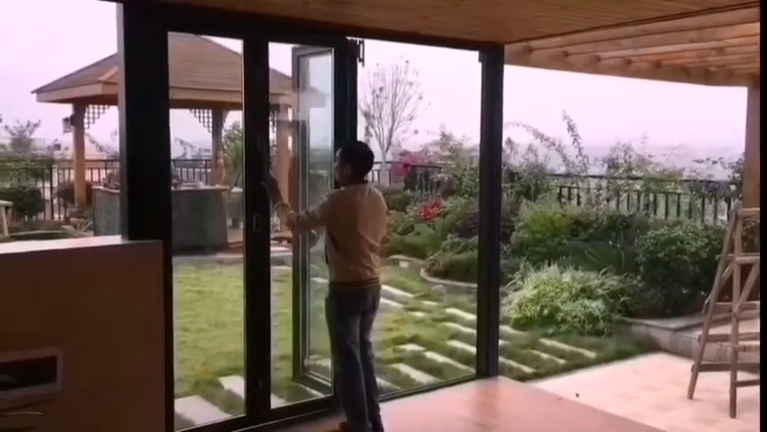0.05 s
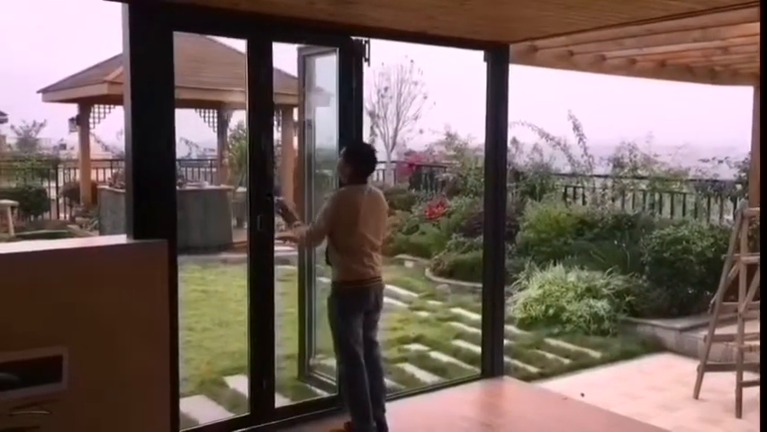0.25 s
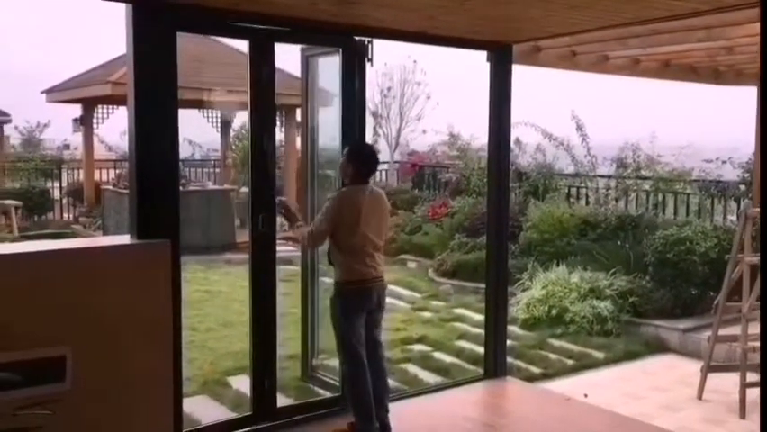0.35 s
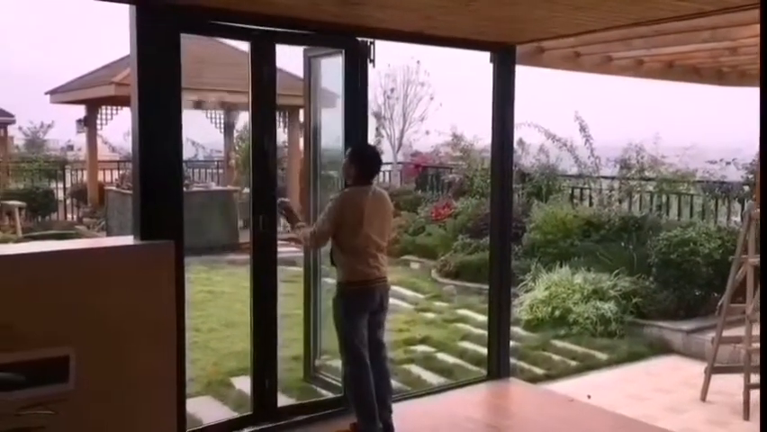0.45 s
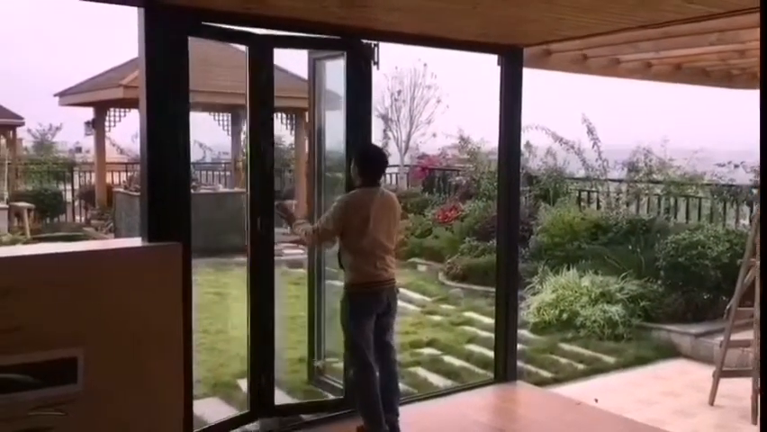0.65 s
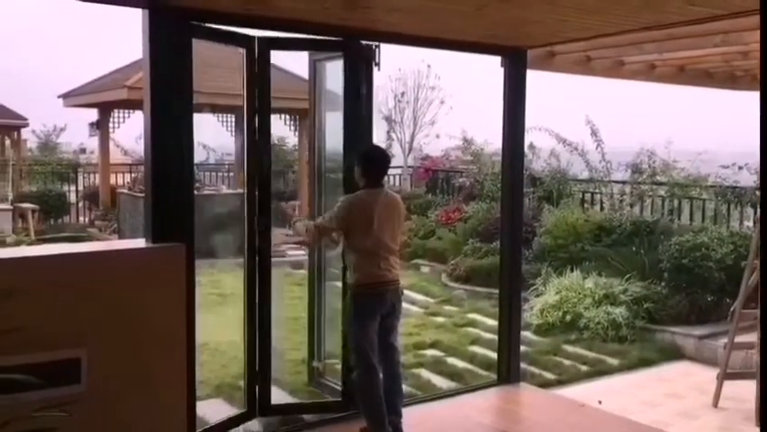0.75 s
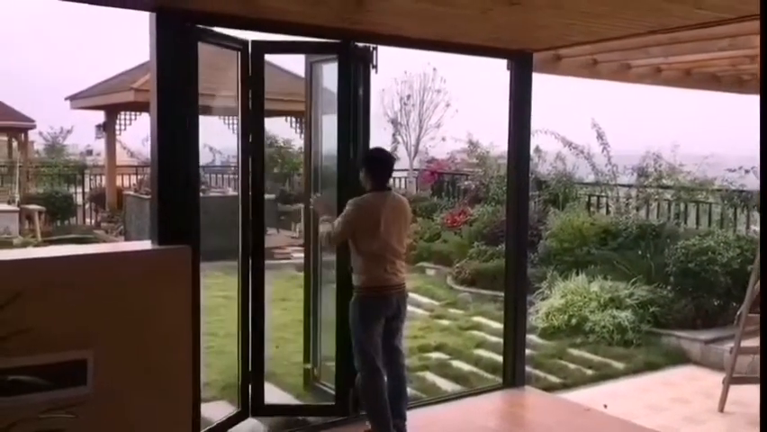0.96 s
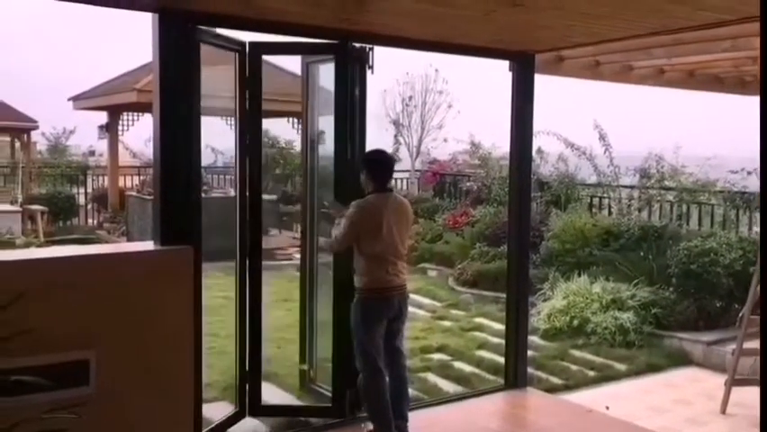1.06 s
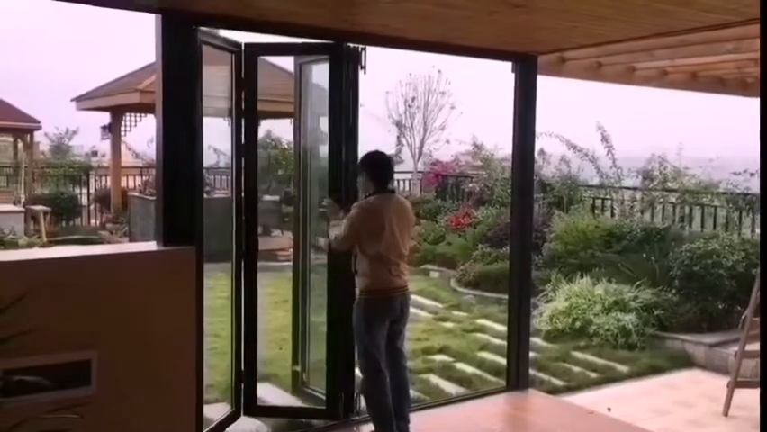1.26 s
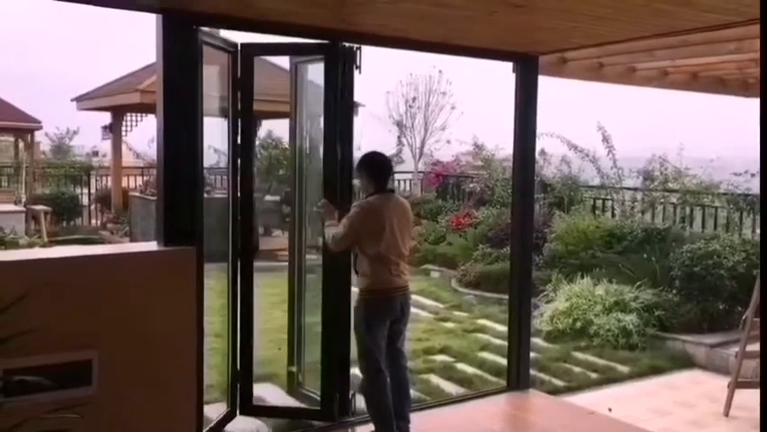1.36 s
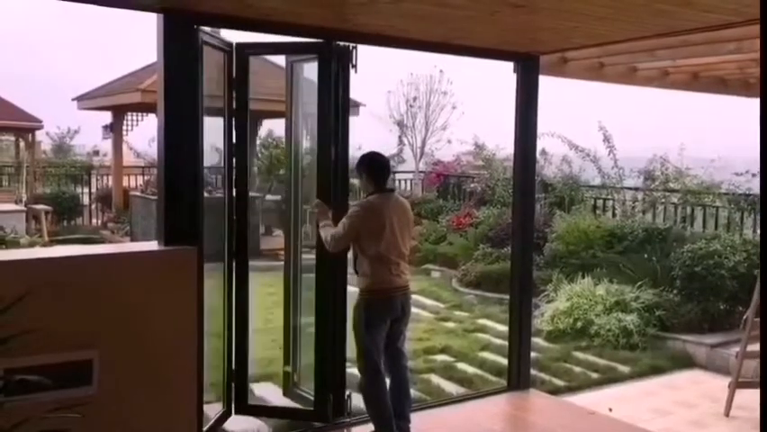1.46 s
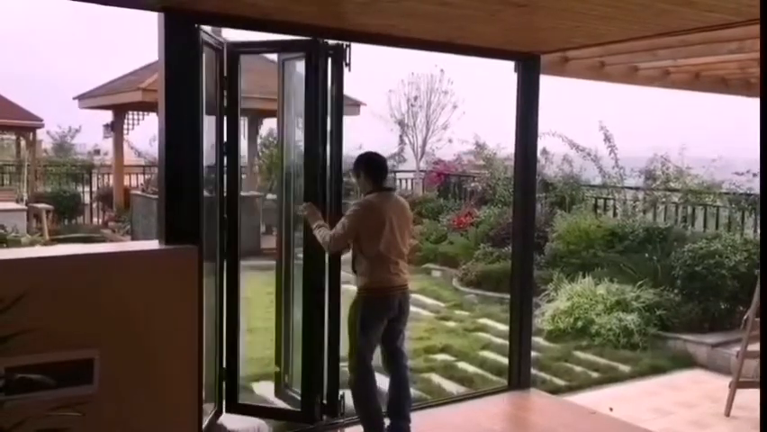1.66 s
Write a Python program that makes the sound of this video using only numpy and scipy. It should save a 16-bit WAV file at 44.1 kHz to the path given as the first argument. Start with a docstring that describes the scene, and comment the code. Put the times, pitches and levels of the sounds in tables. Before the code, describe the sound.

One loud, rattling clack of a folding glass door unlatching, then soft rolling over outdoor rumble.

```python
"""A glazed aluminium folding door is pushed open under a wooden patio roof.
The bolt scrapes, the lock rattles free and snaps: one loud clack that rings in frame, panes and room.
The panels then roll softly along their track with a few small ticks of hinges and rollers,
over a low outdoor rumble and a machine's hum."""
import sys
import numpy as np
from scipy import signal
from scipy.fft import rfft, irfft
from scipy.io import wavfile
from scipy.ndimage import uniform_filter1d

SR = 44100
rng = np.random.default_rng(int(sys.argv[2]) if len(sys.argv) > 2 else 0)


def transcribe(signal):
    """Save signal, clipped to [-1, 1], as a 16-bit WAV file at the path in sys.argv[1]."""
    frames = np.atleast_2d(signal).T
    limited = np.clip(frames, -1, 1)
    pcm = np.round(limited * 32767).astype(np.int16)
    wavfile.write(sys.argv[1], SR, pcm)


N = 74970
TIME = np.arange(N) / SR


def from_db(db):
    """Decibels to gain."""
    return 10 ** (np.asarray(db) / 20)


def unit_energy(x):
    """Scale to a sum of squares of 1."""
    return x / np.sqrt(np.sum(x ** 2) + 1e-20)


def unit_rms(x):
    """Scale to rms 1."""
    return unit_energy(x) * np.sqrt(len(x))


def at_hz(points, hz):
    """Interpolate (freq_hz, value) points over log frequency."""
    known_hz, values = np.transpose(points)
    return np.interp(np.log(np.maximum(hz, 1)), np.log(known_hz), values)


def envelope(points):
    """Gain curve through (time_s, level_db) points."""
    return from_db(np.interp(TIME, *np.transpose(points)))


def decay(t60_s):
    """Envelope falling 60 dB in t60_s."""
    return np.exp(-np.log(1000) * TIME / t60_s)


def add(out, start_s, sound):
    """Mix sound into out from start_s on."""
    start = int(start_s * SR)
    out[start:] += sound[:N - start]


def noise(colour, tilt_db_per_oct=0):
    """Noise shaped by (freq_hz, density_db) points and a tilt; rms 1."""
    hz = np.maximum(np.fft.rfftfreq(N, 1 / SR), 1)
    gain = from_db(at_hz(colour, hz) + tilt_db_per_oct * np.log2(hz))
    return unit_rms(irfft(rfft(rng.standard_normal(N)) * gain, N))


def resonance(x, hz, width_hz):
    """Two-pole band-pass, peak gain 1."""
    radius = np.exp(-np.pi * width_hz / SR)
    feedforward = np.array([1, 0, -1]) * (1 - radius ** 2) / 2
    feedback = [1, -2 * radius * np.cos(2 * np.pi * hz / SR), radius ** 2]
    return signal.lfilter(feedforward, feedback, x)


def tone(hz, waver, width_hz=9):
    """Sine mixed with narrow-band noise; waver 0 is steady, 1 all noise."""
    steady = np.sqrt(2) * np.sin(2 * np.pi * (hz * TIME + rng.random()))
    unsteady = unit_rms(resonance(rng.standard_normal(2 * N), hz, width_hz)[N:])
    return np.sqrt(1 - waver ** 2) * steady + waver * unsteady


def struck(blows, modes):
    """A body rings with the same damped modes at every blow."""
    out = np.zeros(N)
    ring = sum(from_db(db) * np.sin(2 * np.pi * hz * TIME) * decay(t60_s) for hz, db, t60_s in modes)
    for start_s, level_db in blows:
        add(out, start_s, from_db(level_db) * ring)
    return out


def background():
    """Outdoor rumble and hiss, a machine's hum and a low drone that swells and sinks."""
    # outdoor air spectrum: freq_hz, density_db
    air_colour = [(22, -40), (40, -1), (58, 4), (80, -0.5), (120, -5), (200, -7), (330, -17), (550, -23),
                  (1050, -20), (1800, -26), (3000, -28.5), (4800, -32.5), (7300, -37.5)]
    # machine partials: pitch_hz, rms_db, waver
    partials = [(100, -61, 0.1), (150.6, -54.5, 0.09)]
    # drone swells: time_s, rms_db
    swells = [(0, -73), (.25, -51), (.36, -68), (.5, -50.5), (.62, -59), (.73, -42), (.92, -60),
              (1.24, -54), (1.31, -43.5), (1.39, -59.5), (1.7, -52)]
    hum = sum(from_db(rms_db) * tone(hz, waver) for hz, rms_db, waver in partials)
    drone = envelope(swells) * tone(hz=62, waver=0.51)
    return from_db(-49) * noise(air_colour) + hum + drone


def bolt():
    """The bolt slides before it lets go: a faint scrape swelling into the rattle."""
    # scrape envelope: time_s, level_db
    levels = [(0, -63.5), (.1, -88), (.135, -59), (.18, -60.5), (.21, -47), (.225, -35.5), (.24, -55),
              (.28, -91)]
    # scrape spectrum: freq_hz, density_db
    colour = [(300, -12), (750, -2), (1400, -6), (2700, -1), (4000, -9), (7500, -23.5)]
    return envelope(levels) * noise(colour)


def rollers(grit_db=1.5, grit_s=0.006):
    """Rollers rush softly in the track, louder as the panels fold; grit makes it uneven."""
    # rolling envelope: time_s, level_db
    levels = [(0, -59), (.18, -55), (.45, -59), (.7, -74), (.95, -61.5), (1.14, -51), (1.22, -46),
              (1.3, -52.5), (1.4, -51), (1.48, -50.5), (1.6, -51), (1.7, -48)]
    # rolling spectrum: freq_hz, density_db
    colour = [(100, 13.5), (220, 9), (400, -1), (650, 1.5), (1100, 0.5), (1700, -1.5), (2400, -10.5),
              (4000, -27.5), (7500, -47.5)]
    grit = unit_rms(uniform_filter1d(rng.standard_normal(N), int(grit_s * SR)))
    return envelope(levels) * from_db(grit_db * grit) * noise(colour)


def seal(t60_s=0.12):
    """Dull thuds as the panel is pushed against its seal."""
    # thuds: start_s, level_db
    thuds = [(0.1993, -20), (0.211, -30)]
    # thud spectrum: freq_hz, density_db
    colour = [(100, -13.5), (300, -32), (700, -21), (1500, -23.5), (7000, -35)]
    out = np.zeros(N)
    for start_s, level_db in thuds:
        add(out, start_s, from_db(level_db) * unit_energy(noise(colour) * decay(t60_s)))
    return out


def lock(t60_s=0.044, gain_db=-1):
    """The lock rattles: each metal contact is a short crack coloured by the hollow frame."""
    # metal contacts: start_s, strength_db, tilt_db_per_oct
    contacts = [(0.2164, -14.5, -1), (0.2213, -6, 1), (0.225, 0.5, 2), (.2305, -4.5, 6), (0.2347, 3.5, -1),
                (.2380, -1.5, 2), (0.2429, -6.5, -6), (0.2456, 3.5, 2), (0.2554, -8, -1.5),
                (0.2631, 9, 5.5), (.2660, 5.5, 11), (0.2669, 6, 0), (0.2717, 7, 1.5), (.2765, 2.5, 4.5),
                (0.2815, 1, 1), (0.2939, -5, -3), (0.2983, 0, 4.5), (0.3256, -11.5, -3)]
    # contact spectrum: freq_hz, density_db
    colour = [(120, -29), (250, -11), (380, -11), (550, -12), (900, -7), (1600, -2.5), (2800, 1.5),
              (4400, -3.5), (5800, -7.5), (7600, -9)]
    # frame cavity resonances: centre_hz, width_hz, boost_db
    hollows = [(375, 110, 4.5), (666, 68, 5), (820, 130, 4), (1100, 57, 3.5), (1520, 140, 6.5),
               (2520, 70, -1), (3076, 90, 3), (4220, 130, -1.5)]
    out = np.zeros(N)
    for start_s, strength_db, tilt_db_per_oct in contacts:
        crack = noise(colour, tilt_db_per_oct) * decay(t60_s)
        for centre_hz, width_hz, boost_db in hollows:
            crack = crack + (from_db(boost_db) - 1) * resonance(crack, centre_hz, width_hz)
        add(out, start_s, from_db(strength_db + gain_db) * unit_energy(crack))
    return out


def panel(pane_db=-8.5):
    """Two blows set the aluminium frame and its glass panes ringing."""
    # blows on the frame: start_s, level_db
    blows = [(.2257, -37.5), (.2685, -43)]
    # frame modes: pitch_hz, gain_db, t60_s
    frame_modes = [(1052, 3.5, 0.56), (1473, 5, .3), (1517, -17, 0.75), (1540, -25, .25), (1934, 3, 0.27),
                   (2225, -4.5, 0.27), (2328, 8.5, .28), (2490, -26, .28), (2615, 3, 0.27), (2982, 7, .32),
                   (3000, -2, .28), (3260, 3.5, .25), (3830, -1.5, 0.24), (4090, -14, .2)]
    # glass modes: pitch_hz, gain_db, t60_s
    pane_modes = [(439.5, -1, 0.5), (547, -8, 0.26), (620, -14, 0.86), (684, -10, .5), (745, -7, 0.61),
                  (826, -3, 0.3), (877, -15, 0.57)]
    return struck(blows, frame_modes) + from_db(pane_db) * struck(blows, pane_modes)


def latch():
    """The latch snaps against its stop and rebounds, ringing briefly."""
    # snap and rebound: start_s, level_db
    snaps = [(.2680, -10), (.2998, -21.5)]
    # latch modes: pitch_hz, gain_db, t60_s
    modes = [(398, -25, 0.087), (2670, -2, 0.007), (4415, 0, 0.017), (4800, -12, 0.035), (5130, -5, 0.0087),
             (7030, -14, 0.047)]
    return struck(snaps, modes)


def ticks(q=3.5):
    """Hinges and rollers tick and scuff: brief slips, each ringing at one pitch."""
    # slips: start_s, level_db, pitch_hz, t60_s
    slips = [(.692, -34.5, 6000, 0.13), (.8919, -33, 2500, 0.032), (0.9267, -33, 2380, 0.027),
             (.9594, -36, 2500, 0.033), (1.3315, -37, 6300, 0.022), (1.44, -35, 5830, 0.16),
             (1.4664, -33, 3200, 0.087), (1.5992, -27.5, 2700, 0.015), (1.5999, -29.5, 1200, 0.016)]
    out = np.zeros(N)
    for start_s, level_db, pitch_hz, t60_s in slips:
        slip = rng.standard_normal(N) * decay(t60_s)
        for _ in range(2):
            slip = resonance(slip, pitch_hz, pitch_hz / q)
        add(out, start_s, from_db(level_db) * unit_energy(slip))
    return out


def hinge():
    """A hinge clicks once as the panels fold."""
    # click: start_s, level_db
    clicks = [(1.2593, -43)]
    # hinge modes: pitch_hz, gain_db, t60_s
    modes = [(1820, -3, 0.024), (2540, -0.5, 0.04), (2660, -3.5, 0.019), (4050, -7.5, .015),
             (5420, -6.5, 0.023), (6500, -15, 0.013)]
    return struck(clicks, modes)


def room(x, gain_db=-5, gap_s=0.0032, build_s=0.004):
    """Diffuse reflections build up and die away, soonest in the bass and the top treble."""
    # reverberation: freq_hz, t60_s, level_db
    reverb = np.array([(153, 0.21, -0.5), (400, 0.63, -1.5), (756, 0.48, 5), (1250, 0.37, 2),
                       (1920, 0.64, -1.5), (2900, 0.56, -6.5), (4530, 0.42, 1), (6950, 0.24, 0.5)])
    edges_hz = np.geomspace(100, 9000, 13)
    tail = np.zeros(N)
    for low_hz, high_hz in zip(edges_hz, edges_hz[1:]):
        bandpass = signal.butter(2, [low_hz, high_hz], "band", fs=SR, output="sos")
        band = signal.sosfilt(bandpass, rng.standard_normal(N))
        centre_hz = np.sqrt(low_hz * high_hz)
        t60_s = at_hz(reverb[:, [0, 1]], centre_hz)
        level_db = at_hz(reverb[:, [0, 2]], centre_hz)
        tail += from_db(level_db) * band * decay(t60_s)
    onset = np.clip((TIME - gap_s) / build_s, 0, 1)
    tail = unit_energy(tail * onset) * np.sqrt(2 * edges_hz[-1] / SR)  # mean in-band power gain near 1
    return from_db(gain_db) * signal.fftconvolve(x, tail)[:N]


def far_wall(x, delay_s=0.051, gain_db=-11):
    """One dull midrange echo off the far wall."""
    out = np.zeros(N)
    add(out, delay_s, from_db(gain_db) * resonance(x, hz=1530, width_hz=1700))
    return out


def scene():
    """The door and its reflections over the background; mono."""
    snap = latch()
    knocks = lock() + seal() + ticks() + hinge()
    to_walls = knocks + from_db(-9.5) * snap  # the snap faces the listener, so less reaches the walls
    reflections = room(to_walls) + far_wall(to_walls)
    return (knocks + snap + panel() + reflections + bolt() + rollers() + background())[None]


def record(dry):
    """A small microphone with narrow dips and a steep treble cut."""
    # microphone response: centre_hz, width_hz, gain_db
    bands = [(3734, 74, -14), (4930, 180, -36), (6020, 480, 1), (7340, 220, -34)]
    for centre_hz, width_hz, gain_db in bands:
        dry = dry - (1 - from_db(gain_db)) * resonance(dry, centre_hz, width_hz)
    cutoff_hz = 7620
    return signal.sosfilt(signal.ellip(12, 0.2, 70, cutoff_hz, fs=SR, output="sos"), dry)


dry = scene()
out = record(dry)
transcribe(out)
```